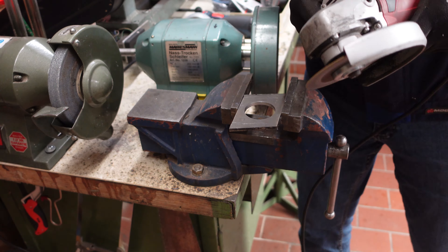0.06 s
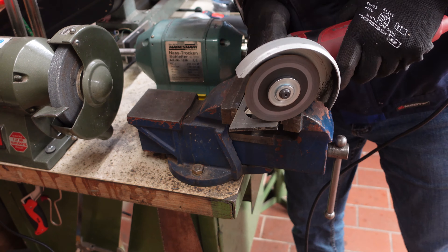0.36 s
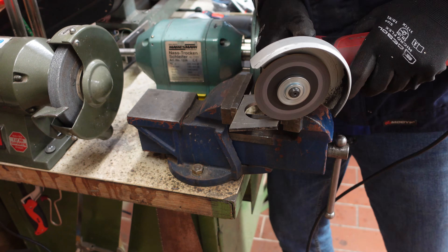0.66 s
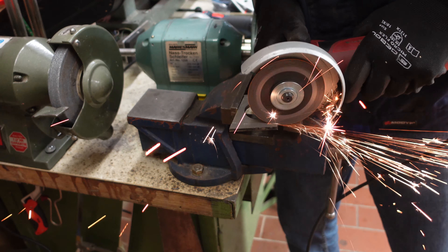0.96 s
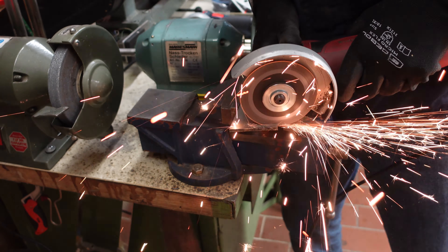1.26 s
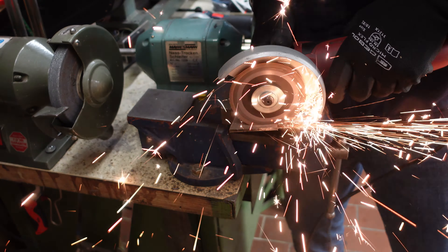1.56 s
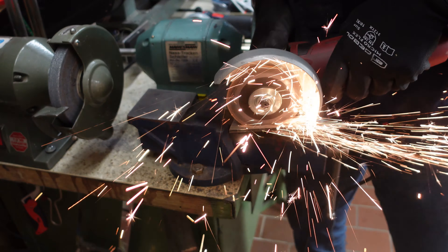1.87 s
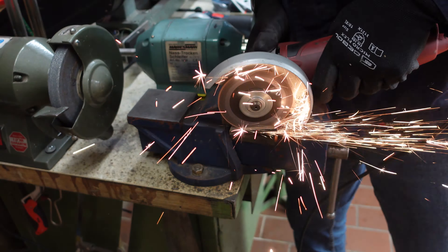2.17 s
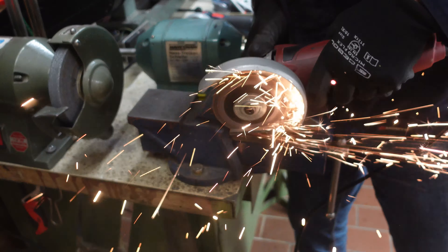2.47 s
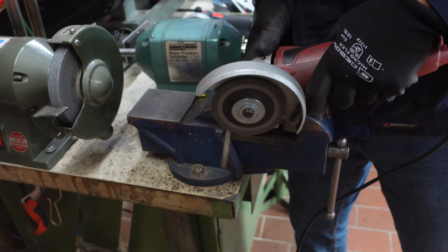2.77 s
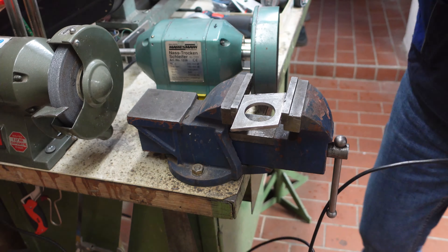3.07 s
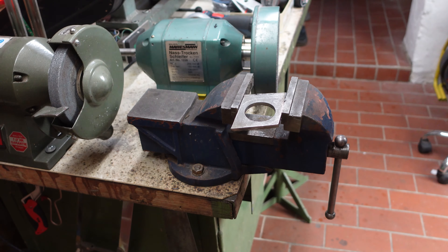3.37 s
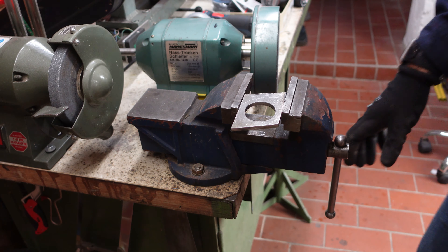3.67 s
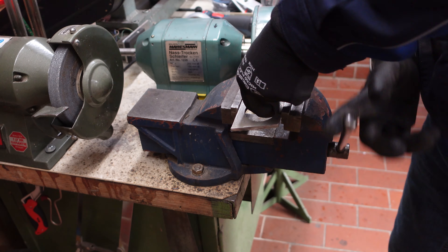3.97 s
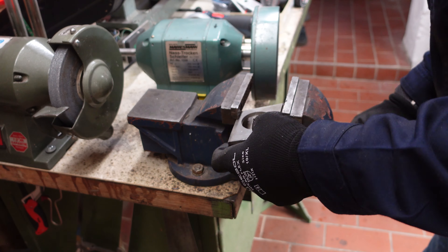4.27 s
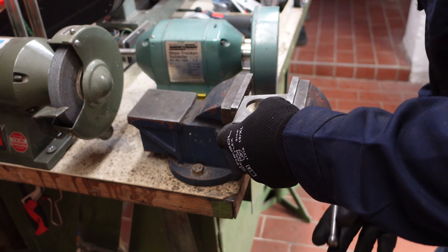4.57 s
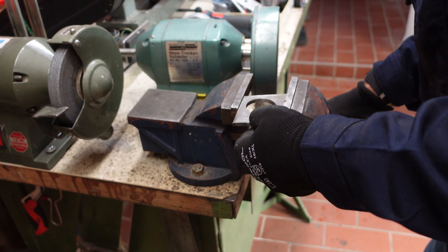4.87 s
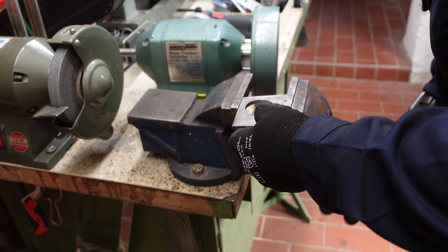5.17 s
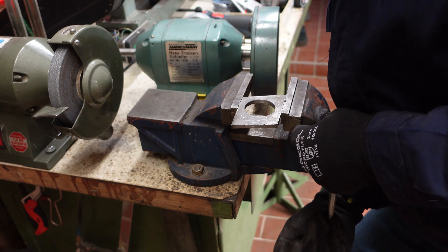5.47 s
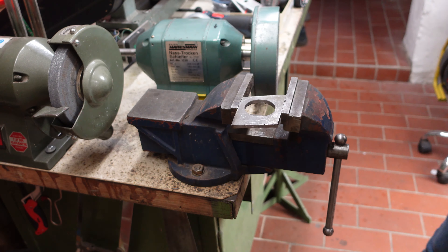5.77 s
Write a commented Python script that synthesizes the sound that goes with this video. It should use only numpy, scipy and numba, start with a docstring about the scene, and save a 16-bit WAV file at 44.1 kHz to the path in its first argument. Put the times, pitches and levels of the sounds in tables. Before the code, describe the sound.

A whining angle grinder rasps against steel and coasts to a stop, followed by clinks and knocks as the vice is reset.

```python
"""A jolt and a rising whine: an angle grinder spins up in a small workshop, bites into a steel plate
held in a vice, runs free again and coasts to a stop. Its fan rushes, its gears whine and rasp, and the
grit of the disc scrapes much the same pattern on every turn and makes the steel ring. Then feet shift,
the vice handle clinks, gloves and sleeves rustle, and plate and vice knock as they are reset."""
import sys
import numpy as np
from scipy import signal
from scipy.fft import rfft, irfft, next_fast_len
from scipy.io import wavfile
from scipy.ndimage import uniform_filter1d, map_coordinates
from numba import njit

SR = 44100
rng = np.random.default_rng(int(sys.argv[2]) if len(sys.argv) > 2 else 0)


def output_pcm(signal):
    """Save a mono or channel-first signal as 16-bit PCM at the path in sys.argv[1].

    Samples are clipped to [-1, 1] before scaling.
    """
    pcm = np.clip(np.atleast_2d(signal).T, -1, 1) * 32767
    wavfile.write(sys.argv[1], SR, np.round(pcm).astype(np.int16))


N = 257103
T = np.arange(N) / SR
ON_S, TOUCH_S, LIFT_S, OFF_S, STOP_S = .061, .757, 2.682, 3.026, 3.982
CUT_PROGRESS = np.clip((T - TOUCH_S) / (LIFT_S - TOUCH_S), 0, 1)

# hard bites of the disc (start [s], end [s], plate note [Hz], song [dB], chatter [dB], vice shake [dB])
BITES = [(1.187, 1.25, 2300, -48, -49, -7.5), (1.29, 1.363, 2740, -42.5, -37.5, -10),
         (1.41, 1.528, 2410, -45.5, -37.5, -2), (1.54, 1.664, 2490, -42, -35.5, -11),
         (1.69, 1.802, 2450, -51, -37.5, 7.5), (1.905, 1.983, 2270, -43, -50, 2.5),
         (2.55, 2.667, 2450, -58, -42, -16)]


def grinder():
    """The whole tool, driven by its rotor; carried to the right as it coasts."""
    speed_hz = rotor_speed()
    rotor_turns = np.cumsum(speed_hz * (1 + (.001 + .003 * loaded()) * walk(25))) / SR
    disc_turns = rotor_turns / 3.23  # bevel gear ratio
    bounce = (1 + .12 * np.sin(2 * np.pi * disc_turns)) * undb(walk(110))
    hand_pressure = undb(1.5 * walk(16))
    dip = undb(-4 * swell(T, 2.878, .012))  # the rush dips briefly
    # each side hears its own eddies and grains
    noise = np.array([(fan(speed_hz) + gear_rasp(speed_hz, disc_turns)) * dip
                      + jolt() + growl(speed_hz) + last_turns()
                      + grinding(rotor_turns, disc_turns, bounce, hand_pressure) for _ in range(2)])
    tones = np.array([whine(speed_hz, rotor_turns + lead, disc_turns)
                      + coasting_whine(speed_hz, rotor_turns + lead, disc_turns)
                      + squeals(disc_turns) for lead in (0, .008)])
    near = bench_scatter(noise * undb(1) + tones * undb(1.5))
    pan_db = np.interp(T, (0, 2.85, 3.2, 4), (-.3, 0, -2.5, -3.5))
    return workshop(near, wet_db=-24.5, t60_s=.029) * undb(np.array([pan_db, -pan_db]) / 2)


def rotor_speed():
    """Turns per second: quick run-up, sag under load, coast against air drag and friction."""
    # load on the disc (time [s], speed lost [Hz])
    sag = [(.72, 0), (.85, 40), (1.03, 155), (1.22, 232), (1.35, 262), (1.45, 248), (1.56, 305),
           (1.75, 275), (1.9, 345), (2.06, 335), (2.13, 190), (2.3, 188), (2.5, 212), (2.6, 198),
           (2.7, 115), (2.78, 40), (2.92, 0)]
    free_hz, spin_up_s, drag_per_s, friction_hz_per_s = 588, .051, 1.3, 286
    run_up = 1 - np.exp(-(np.maximum(T - ON_S, 0) / spin_up_s) ** .82)
    powered_hz = free_hz * run_up - np.interp(T, *np.transpose(sag))
    friction_hz = friction_hz_per_s / drag_per_s
    coasting_hz = (free_hz + friction_hz) * np.exp(-drag_per_s * np.maximum(T - OFF_S, 0)) - friction_hz
    return np.maximum(np.minimum(powered_hz, coasting_hz), 10)


def running():
    """1 while the rotor turns; abrupt start."""
    return gate(0, STOP_S) * np.clip((T - ON_S) / .008, 0, 1)


def loaded(slack_s=.018):
    """1 while the work holds the gear teeth together."""
    return gate(TOUCH_S, LIFT_S + slack_s)


def bites():
    """Depth of bite (0-1), then its gains of song, chatter and vice shake."""
    gates = np.array([gate(start_s, end_s) for start_s, end_s, *_ in BITES])
    return gates.max(0), *(undb(np.array(BITES)[:, 3:]).T @ gates)


def grinding(rotor_turns, disc_turns, bounce, hand_pressure):
    """Grit chatters and scrapes on the plate, throws sparks and excites disc, plate and vice."""
    # broad drags of the disc: more scrape, less chatter and sizzle (start [s], end [s])
    drags = [(.83, 1.2), (2.33, 2.47)]
    drag = sum(gate(start_s, end_s) for start_s, end_s in drags)
    bite, bite_song, bite_chatter, bite_shake = bites()
    judder = .66 * bite  # in a bite part of the grit follows the rotor
    disc_grit = np.sqrt(1 - judder ** 2) * wheel_grain(disc_turns, memory=.78, grain_db=5)
    grit = (disc_grit + judder * wheel_grain(rotor_turns, memory=.9, grain_db=4, size=180)) * bounce
    chips = wheel_grain(disc_turns, memory=.39, grain_db=3) * bounce
    chatter_hz, chatter_db = over_cut(3300, 4120, power=3.6), over_cut(-35, -38)
    chatter = resonate(grit, chatter_hz, 1400, 1900)
    chatter *= np.hypot(undb(chatter_db - 6.5 * drag), bite_chatter)
    vice_drone = resonate(resonate(grit, 780, 260), 840, 500)
    vice_drone *= np.hypot(undb(chatter_db - 11.5), undb(-52.5) * bite_shake)
    seated = np.interp(T, (TOUCH_S, drags[0][0]), (.35, 1))  # at first the disc only skims
    ringing = (chatter + disc_ring(grit) + plate_song(grit, bite_song)) * seated
    hiss = (edge_ring(chips) + sparks(drag)) * hand_pressure
    return (ringing + hiss + scrape(chips, drag) + vice_drone) * gate(TOUCH_S, LIFT_S)


def disc_ring(grit):
    """Narrow disc resonances wander and swell as the contact shifts."""
    # disc resonances (centre [Hz], width [Hz], level [dB])
    modes = [(2780, 170, -47.5), (3140, 200, -42), (3480, 200, -43.5), (3810, 160, -44.5), (4800, 200, -51)]
    out = 0
    for hz, width_hz, db in modes:
        centre_hz = hz * (1 + .017 * walk(14))
        out += resonate(grit, centre_hz, width_hz, 2 * width_hz) * undb(db + 3.6 * walk(22.04))
    return out


def plate_song(grit, bite_gain):
    """The plate's note moves with the contact; bites add a narrower ring."""
    middles_s = [(start_s + end_s) / 2 for start_s, end_s, *_ in BITES]
    note_hz = np.interp(T, middles_s, [row[2] for row in BITES]) * (1 + .018 * walk(14))
    return resonate(grit, note_hz, 90, 260) * bite_gain + resonate(grit, note_hz, 236, 370) * undb(-43)


def edge_ring(chips):
    """The disc's edge rings in two high bands and squeals as it first skims the plate."""
    edge_hz = over_cut(10260, 11080) * (1 + .042 * CUT_PROGRESS * walk(60))
    skim = undb(-32.5) * swell(T, .81, .028)
    lower = resonate(chips, edge_hz, 1700, 3600) * np.hypot(undb(over_cut(-35, -41.5)), skim)
    return lower + resonate(chips, 15450, 2500, 4000) * undb(over_cut(-40.5, -52))


def scrape(chips, drag):
    """Broadband scrape of grit on steel."""
    # scrape (frequency [Hz], level [dB])
    spectrum = [(50, -30.5), (100, -22.5), (160, -27.5), (700, -3.5), (1500, 4), (3000, 13.5), (5000, 10),
                (6500, 6.5), (9000, 11.5), (12000, -3.5), (16000, -6.5)]
    return steady(colour(chips, spectrum), 4980, 7960) * undb(over_cut(-42.5, -39.5) + 4.5 * drag)


def sparks(drag):
    """Sparks sizzle in the top treble."""
    # sizzle (frequency [Hz], level [dB])
    spectrum = [(7000, -47.5), (10500, -4), (11800, -2.5), (13500, 2.5), (15500, -2.5)]
    sizzle = colour(rng.standard_normal(N) * undb(2 * walk(2500)), spectrum)
    return steady(sizzle, 12000, 15200) * undb(over_cut(-38, -36) - 3 * drag)


def squeals(disc_turns):
    """Stick-slip makes short, rough glides; in a bite the disc thumps the vice once a turn."""
    # disc and plate squeals (start [s], end [s], first pitch [Hz], last pitch [Hz], relative level [dB])
    glides = [(.825, .92, 3380, 3120, -38), (1.185, 1.255, 3830, 3750, -29.5),
              (1.19, 1.255, 2990, 2930, -36), (1.17, 1.255, 2290, 2220, -39),
              (1.215, 1.26, 1890, 1870, -44), (1.3, 1.36, 2380, 2290, -39), (1.33, 1.37, 3400, 3330, -37),
              (1.39, 1.5, 2330, 2410, -36), (1.51, 1.65, 2390, 2450, -40), (1.43, 1.53, 3120, 3180, -35),
              (1.468, 1.495, 3750, 3720, -31), (1.62, 1.69, 3150, 3090, -37), (1.68, 1.72, 3270, 3400, -37),
              (1.72, 1.77, 3780, 3850, -37), (1.79, 1.87, 3480, 3560, -35.5),
              (1.82, 1.875, 3160, 3090, -37), (1.93, 1.965, 2250, 2370, -39), (1.94, 2, 3680, 3880, -38),
              (1.995, 2.025, 2340, 2360, -39), (2.015, 2.07, 2870, 2890, -39),
              (2.055, 2.12, 3850, 3890, -36), (2.52, 2.585, 3640, 3540, -33.5),
              (2.58, 2.625, 3600, 4020, -33), (2.622, 2.665, 3900, 3790, -33.5)]
    bite_shake = bites()[-1]
    out = undb(-80) * bite_shake * np.sin(2 * np.pi * disc_turns + walk(30))
    for start_s, end_s, first_hz, last_hz, db in glides:
        phase_rad = 2 * np.pi * np.cumsum(np.interp(T, (start_s, end_s), (first_hz, last_hz))) / SR
        rough_rad = .35 * np.sin(2 * np.pi * disc_turns) + .5 * walk(130) + 2 * np.pi * rng.random()
        envelope = undb(db + .3 + 2 * walk(70)) * gate(start_s, end_s, edge_s=.016)
        out += np.sin(phase_rad + rough_rad) * envelope
    return np.sqrt(2) * out


def fan(speed_hz):
    """Turbulent air; slower, lower eddies as the rotor slows."""
    # eddies at full speed (frequency [Hz], level [dB])
    spectrum = [(60, -48), (150, -42), (300, -23), (600, -9), (1000, -5), (1500, -0.5), (2200, 3.5),
                (3000, 5.5), (4000, 1), (5200, 0.5), (7000, -10.5), (16000, -17)]
    # rush of air off the work (rotor speed [Hz], level [dB])
    rush = [(40, -60), (130, -55), (256, -41.5), (400, -40), (500, -40), (590, -39.5)]
    pace = np.clip(speed_hz / speed_hz.max(), .3, 1) ** .6
    eddies = colour(rng.standard_normal(N), spectrum)
    air = steady(map_coordinates(eddies, [np.cumsum(pace)], order=3), 400, 1615)
    return air * response(speed_hz, rush) * undb(-13 * loaded() + 2.1 * walk(45)) * running()


def gear_rasp(speed_hz, disc_turns, full_speed_hz=131):
    """Off the work, teeth and brushes rasp unevenly over each spindle turn."""
    # gearbox (frequency [Hz], level [dB])
    spectrum = [(100, -46), (300, -19), (600, -22.5), (900, -9.5), (1400, -8), (2000, 2), (3000, 5.5),
                (3900, 3), (5000, 6.5), (7800, 6), (10000, 1), (13000, -0.5), (16000, -5.5)]
    uneven_db = 3.3 * np.tanh(wheel_grain(disc_turns, memory=.73, grain_db=9, size=32))
    rasp = colour(rng.standard_normal(N) * undb(uneven_db), spectrum)
    envelope = np.minimum(speed_hz / full_speed_hz, 1) * (running() - loaded())
    return steady(rasp, 6440, 9970) * envelope * undb(-35 + 1.4 * walk(90))


def whine(speed_hz, rotor_turns, disc_turns, teeth=10):
    """Unbalance hums once a turn and the pinion teeth whine; load damps both."""
    # unbalance hum through the housing (frequency [Hz], level [dB])
    hum_response = [(50, -102), (110, -75), (230, -66.5), (320, -47), (410, -48.5), (500, -59.5),
                    (600, -64)]
    # gear whine through the housing (frequency [Hz], level [dB])
    mesh_response = [(700, -92), (1500, -72), (2800, -55), (3450, -44), (3900, -52), (4600, -43),
                     (5400, -42), (5700, -41.5), (5850, -41.5)]
    angle_rad = 2 * np.pi * rotor_turns
    torque_db = 2.5 * swell(T - ON_S, .075, .075)  # starting torque shakes the rotor
    hum = response(speed_hz, hum_response) * undb(-22.5 * loaded() + torque_db + 3.2 * walk(80))
    hum *= np.sin(angle_rad + .7 * walk(90)) * np.clip((T - ON_S) / .055, 0, 1) ** 2
    runout_rad = .5 * np.sin(2 * np.pi * disc_turns + walk(5.6))  # crown wheel out of true
    rough_rad = (.6 + .7 * loaded()) * walk(150)
    mesh = response(teeth * speed_hz, mesh_response) * undb(-15 * loaded() + 3 * walk(40))
    mesh *= np.sin(teeth * angle_rad + runout_rad + rough_rad)
    return np.sqrt(2) * (hum + mesh) * running()


def jolt():
    """Starting torque slams the gears together; housing resonances swell and die."""
    # jolted housing (centre [Hz], width [Hz], level [dB], peak after switch-on [s])
    modes = [(1260, 300, -37.5, .045), (3600, 600, -31, .022)]
    age_s = np.maximum(T - ON_S, 0)
    return sum(noise_band(hz, width_hz) * undb(db) * (age_s / peak_s * np.exp(1 - age_s / peak_s)) ** 2
               for hz, width_hz, db, peak_s in modes)


def coasting_whine(speed_hz, rotor_turns, disc_turns, bars=24, bearing_order=14.2):
    """Brushes hop over the commutator bars; their octave and a bearing each sweep through a resonance."""
    # commutator whine through the housing (frequency [Hz], level [dB])
    commutator = [(900, -92), (1550, -66), (1780, -43.5), (1900, -47), (2020, -44.5), (2500, -49),
                  (2950, -42), (3350, -45), (4000, -44), (4550, -37), (4900, -43), (5250, -37.5),
                  (5700, -42), (6300, -36), (6900, -41), (7500, -35.5), (8250, -35.5), (8800, -52),
                  (14000, -70)]
    partials = [(bars, response(bars * speed_hz, commutator)),
                (2 * bars, undb(-34.5) * swell(2 * bars * speed_hz, 7000, 1300)),
                (bearing_order, undb(-39) * swell(bearing_order * speed_hz, 3080, 230))]
    runout_rad = .6 * np.sin(2 * np.pi * disc_turns + walk(20))
    out = 0
    for order, gain in partials:
        flicker, jitter_rad = undb(3.6 * walk(75)), .75 * walk(450)
        out += gain * flicker * np.sin(2 * np.pi * order * rotor_turns + runout_rad + jitter_rad)
    return np.sqrt(2) * out * gate(OFF_S, STOP_S)


def growl(speed_hz):
    """Coasting teeth knock about in their play, fall in pitch and wake the housing."""
    # gear housing (centre [Hz], width [Hz], level [dB], rotor speed of strongest drive [Hz])
    modes = [(874, 90, -43.5, 254), (1310, 130, -46.5, 220)]
    speed_oct = np.log2(speed_hz)
    teeth = noise_band(3.05 * speed_hz, 330) * undb(-38.5) * swell(speed_oct, np.log2(403), .78)
    housing = sum(noise_band(hz, width_hz) * undb(db) * swell(speed_oct, np.log2(drive_hz), .89)
                  for hz, width_hz, db, drive_hz in modes)
    return (teeth + housing) * gate(OFF_S, STOP_S)


def last_turns():
    """Friction in the last slow turns: the brushes hiss thinly, a bearing moans."""
    # friction bands, silent if start > end (start [s], end [s], centre [Hz], width [Hz], level [dB])
    bands = [(3.79, 3.98, 13300, 3500, -47), (4.3, 3.975, 6200, 450, -51), (3.84, 3.935, 1356, 210, -51.5)]
    slip = rng.standard_normal(N)
    return sum(resonate(slip, hz, width_hz, width_hz) * undb(db) * gate(start_s, end_s)
               for start_s, end_s, hz, width_hz, db in bands)


def handle_clinks():
    """The loose vice handle bounces in its hole, cracks and rings."""
    # handle modes (frequency [Hz], level [dB], t60 [s])
    handle = [(1512, -8.5, .057), (2198, -4, .046), (2570, -2.5, .047), (2740, -7, .06), (3785, -3.5, .056),
              (6690, 3.5, .052), (7080, 0, .055), (9119, -12, .075), (10290, -12, .062), (11980, -6, .045),
              (15670, -11, .065)]
    # contacts (time [s], peak [dB], brightness [-], favoured mode [Hz], its boost [dB])
    clinks = [(4.13, -22.5, -5, 2200, 1), (4.148, -29.5, -8, 2200, 4), (4.182, -30, -17, 2550, 4),
              (4.202, -47, 6, 7080, 6), (4.213, -39.5, -6, 6690, 5), (4.258, -41.5, -13, 3790, 12),
              (4.299, -43, -10, 2550, 3), (4.305, -44, 0, 7080, 11), (4.322, -49, -20, 1529, 22),
              (4.415, -57, 6, 6690, 4), (4.425, -50, -2, 3790, 13), (4.457, -58, 4, 6690, 0)]
    # contact noise (frequency [Hz], level [dB])
    spectrum = [(30, -38), (120, -7), (400, -4.5), (1500, 5), (3000, 5), (5000, -8.5), (16000, -22)]
    out, t = np.zeros((2, N)), np.arange(SR // 3) / SR
    for time_s, peak_db, brightness, favoured_hz, boost_db in clinks:
        crack = colour(rng.standard_normal((2, len(t))), spectrum) * undb(-60 * t / .052)
        modes = [(hz, db + boost_db * swell(hz, favoured_hz, 300), t60_s) for hz, db, t60_s in handle]
        blow = (ring(modes, t) + .25 * crack) * np.minimum(t / .00575, 1) ** 2
        treble_db = .5 * (brightness + 5.5)
        add(out, time_s - .002, shape(blow, lambda f: np.where(f > 5500, undb(treble_db), 1)), peak_db)
    return out


def vice_knocks():
    """Jaws and plate knock: a thud and a ring of steel."""
    # vice and plate modes (frequency [Hz], level [dB], t60 [s])
    modes = [(320, -13, .12), (649, -11, 0.28), (1070, -3, .082), (1146, 2, .15), (1450, -3, 0.28),
             (2203, 25, 0.027), (4100, -17, .049)]
    # thud (frequency [Hz], level [dB])
    spectrum = [(35, -51), (60, -22), (233, -19), (323, -12), (417, -6.5), (1060, -6), (1380, 3),
                (1510, -5), (2650, -6.5), (4530, -3.5), (12400, -24.5), (13300, -18), (16000, -40)]
    # blows (time [s], peak [dB], tilt [dB/octave], ring [dB])
    knocks = [(-0.04, -25.5, 6, 30), (3.992, -45.5, -4, 1), (4.027, -44, -2.5, 5), (4.581, -52.5, -1, 14),
              (4.716, -48.5, 3, -20), (4.83, -59, 4, -14.5), (5.02, -44.5, -5, -3), (5.109, -48.5, -6.5, 9),
              (5.502, -23.5, 2, -10), (5.567, -45.5, 7, -3), (5.645, -49, 11, -12), (5.692, -40.5, -1, -16)]
    out, t = np.zeros((2, N)), np.arange(SR // 3) / SR
    for time_s, peak_db, tilt_db, ring_db in knocks:
        thud = colour(rng.standard_normal((2, len(t))), spectrum)
        thud *= np.minimum(t / .01, 1) ** 2 * undb(-60 * t / .051)
        thud = shape(thud, lambda f: undb(tilt_db * np.log2(np.maximum(f, 200) / 1000)))
        steel = undb(ring_db) * ring(modes, t) * np.minimum(t / .0063, 1)
        add(out, time_s, thud / abs(thud).max() + steel, peak_db)
    return out


def bumps():
    """Soft, heavy contacts boom in floor and bench, each round one low pitch."""
    # feet and bench (time [s], peak [dB], pitch [Hz])
    contacts = [(3.344, -54, 110), (3.582, -49, 151), (3.6, -40.5, 304), (3.62, -65, 70), (3.7, -59, 160),
                (3.831, -56, 148), (3.99, -53.5, 199), (4.149, -54, 403), (4.21, -49, 540),
                (4.263, -51, 522), (4.298, -60, 416), (4.383, -60.5, 490), (4.958, -59, 412),
                (5.032, -53, 171), (5.515, -62, 62), (5.521, -49, 229), (5.555, -59, 131),
                (5.691, -52, 322)]
    out, t = np.zeros((2, N)), np.arange(SR // 3) / SR
    for time_s, peak_db, hz in contacts:
        spectrum = [(hz / 6, -38), (hz / 1.27, -13), (hz, 0),
                    (hz * 1.18, -12), (hz * 4, -27), (hz * 30, -70)]
        rumble = colour(rng.standard_normal((2, len(t))), spectrum)
        boom = 1.6 * rumble + np.sin(2 * np.pi * (hz * t + .08 * rng.random((2, 1))))
        add(out, time_s, boom * np.minimum(t / .0076, 1) * undb(-60 * t / .14), peak_db)
    return out


def cloth():
    """Gloves and sleeves rub in uneven strokes, faintly in between."""
    # rustle (frequency [Hz], level [dB])
    spectrum = [(47, -36), (80, -10), (178, -7), (338, -34.5), (515, -11.5), (917, -11.5), (1120, -7.5),
                (1340, -13), (1460, -6), (4050, -7.5), (16000, -16)]
    # strokes (middle [s], half length [s], level [dB])
    strokes = [(4.01, 0.093, -56), (4.218, 0.11, -77), (4.638, 0.025, -60.5), (4.72, 0.021, -66),
               (5.024, 0.037, -61), (5.206, 0.042, -67.5), (5.295, 0.011, -61.5), (5.385, 0.064, -63.5),
               (5.573, 0.11, -64.5), (5.693, 0.029, -59.5), (5.796, 0.021, -59)]
    rubbing = undb(-76.5) + sum(undb(db) * swell(T, middle_s, half_s) for middle_s, half_s, db in strokes)
    return colour(rng.standard_normal((2, N)), spectrum) * rubbing * undb(1.5 * walk(150))


def bench_scatter(x):
    """Bench and machines scatter each side's sound to both sides."""
    echoes = rng.standard_normal((2, 2400)) * np.linspace(1, 0, 2400) ** 2
    scattered = signal.fftconvolve(x.sum(0)[None], echoes / np.linalg.norm(echoes[0]), axes=1)
    return x + undb(-11) * scattered[:, :N]


def workshop(x, wet_db, t60_s):
    """Direct sound plus the cluttered room's short diffuse tail."""
    t = np.arange(SR // 2) / SR
    tail = rng.standard_normal((2, len(t))) * undb(-60 * t / t60_s) * (t > .004)
    return x + undb(wet_db) * signal.fftconvolve(x, tail / np.linalg.norm(tail[0]), axes=1)[:, :N]


def room_air():
    """Still air of the room."""
    # room tone (frequency [Hz], level [dB])
    spectrum = [(18, -47), (30, -25), (194, 10.5), (1280, 0), (2410, -7.5), (2680, -8.5), (6720, -8),
                (14800, -15), (16000, -44)]
    return colour(rng.standard_normal((2, N)), spectrum) * undb(-72)


def undb(db):
    """Decibels to gain."""
    return 10 ** (np.asarray(db) / 20)


def gate(start_s, end_s, edge_s=.026):
    """1 between two times, with sloping edges."""
    return np.clip(np.minimum(T - start_s, end_s - T) / edge_s + .5, 0, 1)


def swell(x, middle, half_width):
    """Bell-shaped rise and fall."""
    return np.exp(-((x - middle) / half_width) ** 2)


def over_cut(first, last, power=1):
    """Glide between two values from touch to lift."""
    return np.interp(CUT_PROGRESS ** power, (0, 1), (first, last))


def walk(rate_hz):
    """Smooth random curve; spread near 1."""
    count = int(T[-1] * rate_hz) + 2
    return 1.2 * np.interp(T * rate_hz, np.arange(count), rng.standard_normal(count))


def wheel_grain(turns, memory, grain_db, size=600):
    """Grains round a wheel, met again each turn as they wear into new ones; rms 1."""
    fresh = rng.standard_normal((int(turns[-1]) + 2, size))
    fresh *= undb(grain_db * rng.standard_normal(fresh.shape))
    worn = signal.lfilter([1], [1, -memory], fresh, axis=0)
    x = worn.ravel()[(turns * size).astype(int)]
    return x / x.std()


def response(hz, points):
    """Gain at hz from (frequency [Hz], level [dB]) points."""
    points_hz, db = np.transpose(points)
    return undb(np.interp(np.log(hz), np.log(points_hz), db))


def shape(x, gain):
    """Filter by a gain that is a function of frequency."""
    size = next_fast_len(x.shape[-1])
    hz = np.maximum(np.fft.rfftfreq(size, 1 / SR), 1)
    return irfft(rfft(x, size) * gain(hz), size)[..., :x.shape[-1]]


def colour(x, spectrum):
    """Filter by (frequency [Hz], level [dB]) points; rms 1."""
    y = shape(x, lambda f: response(f, spectrum))
    return y / y.std()


def steady(x, low_hz, high_hz):
    """Hold the slow level of x in one band at 1."""
    band = shape(x, lambda f: (f > low_hz) & (f < high_hz))
    return x / np.sqrt(uniform_filter1d(band ** 2, SR // 10) + 1e-12)


@njit
def svf(x, hz, width_hz):
    """Band-pass with a moving centre, gain 1 there."""
    y, band, low = np.empty(len(x)), 0., 0.
    for i in range(len(x)):
        g, damping = np.tan(np.pi * hz[i] / SR), width_hz / hz[i]
        v = (band + g * (x[i] - low)) / (1 + g * (g + damping))
        band, low, y[i] = 2 * v - band, low + 2 * g * v, damping * v
    return y


def resonate(x, hz, *widths_hz):
    """Band-passes in series, one per width; rms 1."""
    for width_hz in widths_hz:
        x = svf(x, hz * np.ones(N), float(width_hz))
    return x / x.std()


def noise_band(hz, width_hz):
    """Noise-driven resonance; rms 1."""
    return resonate(rng.standard_normal(N), hz, width_hz, 2 * width_hz)


def ring(modes, t):
    """Decaying modes after one blow; peak 1."""
    y = sum(undb(db + 3.1 * rng.standard_normal() - 60 * t / t60_s)
            * np.sin(2 * np.pi * (hz * t + rng.random((2, 1)))) for hz, db, t60_s in modes)
    return y / abs(y).max()


def add(out, time_s, x, peak_db):
    """Mix x into out, its mono peak at peak_db."""
    i = int(time_s * SR)
    x = (x * undb(peak_db) / abs(x.mean(0)).max())[:, max(-i, 0):N - i]
    out[:, max(i, 0):max(i, 0) + x.shape[1]] += x


def scene():
    """Grinder, handling noises and room."""
    tool = grinder()
    handling = workshop(handle_clinks() + vice_knocks() + bumps(), wet_db=-19, t60_s=.18)
    return tool + handling + cloth() + room_air()


def record(dry):
    """Steep low-pass at 15850 Hz."""
    return signal.sosfilt(signal.ellip(10, .2, 75, 15850, fs=SR, output="sos"), dry)


dry = scene()
out = record(dry)
output_pcm(out)
```